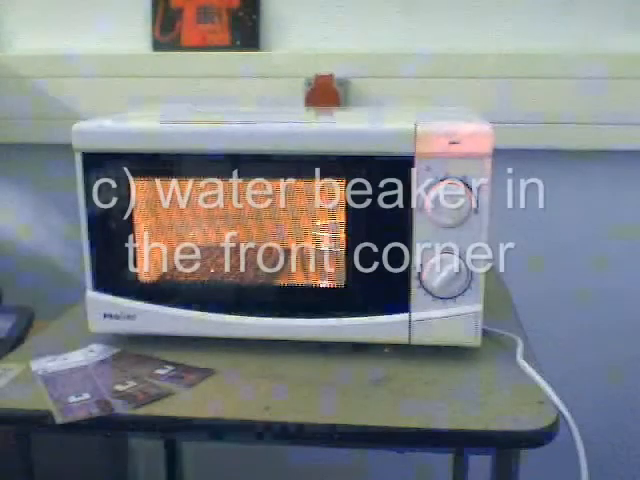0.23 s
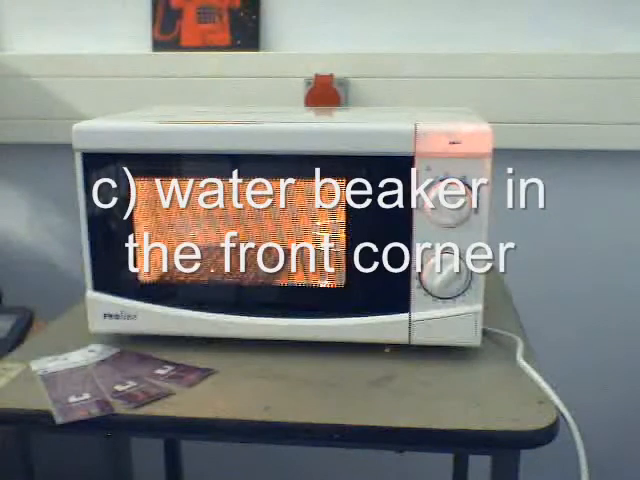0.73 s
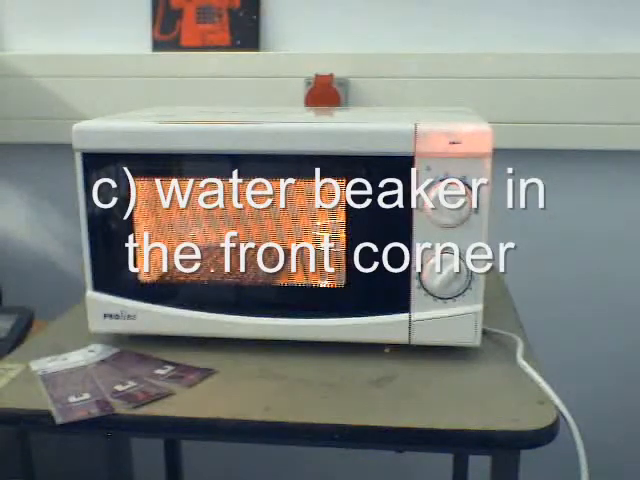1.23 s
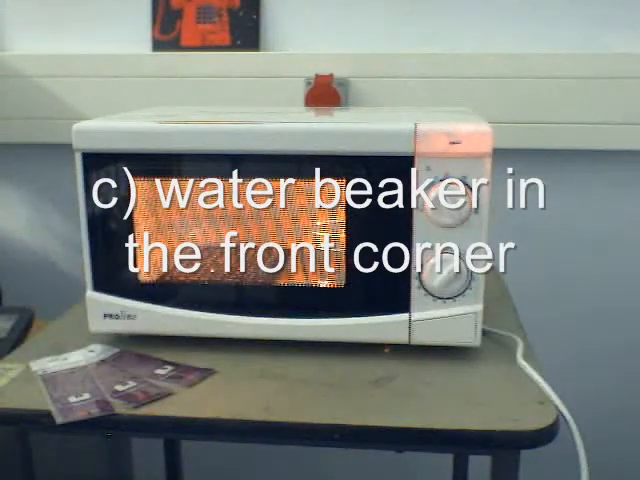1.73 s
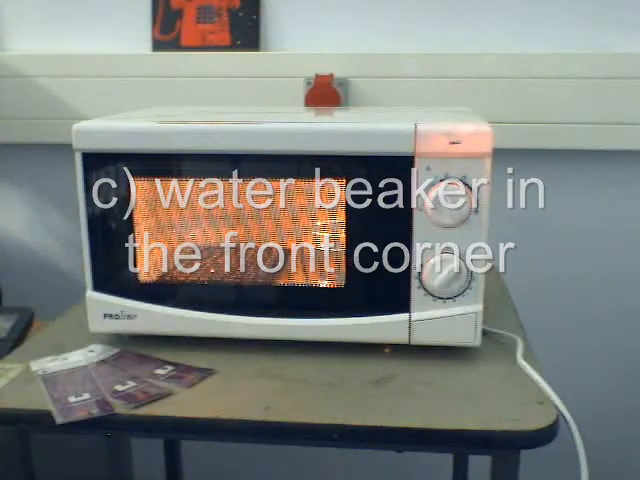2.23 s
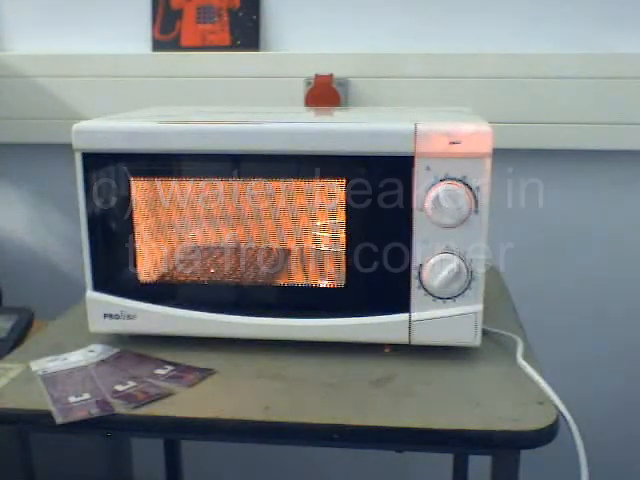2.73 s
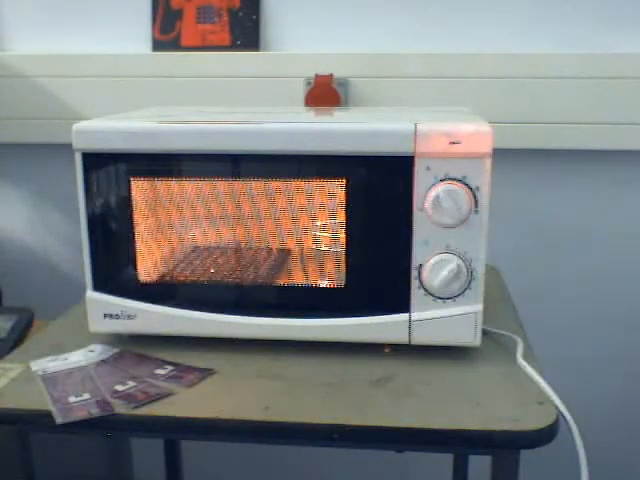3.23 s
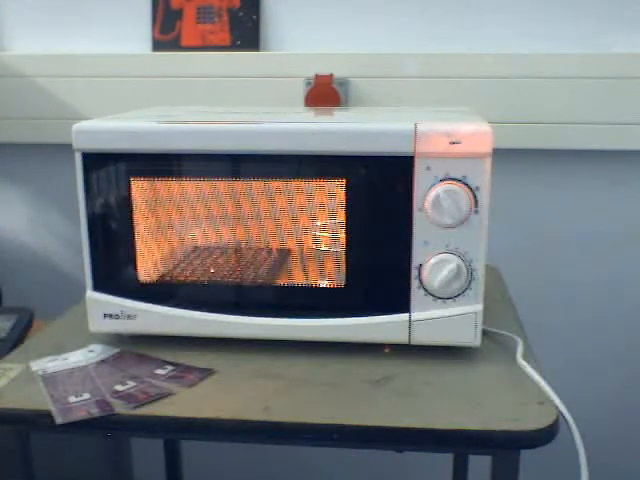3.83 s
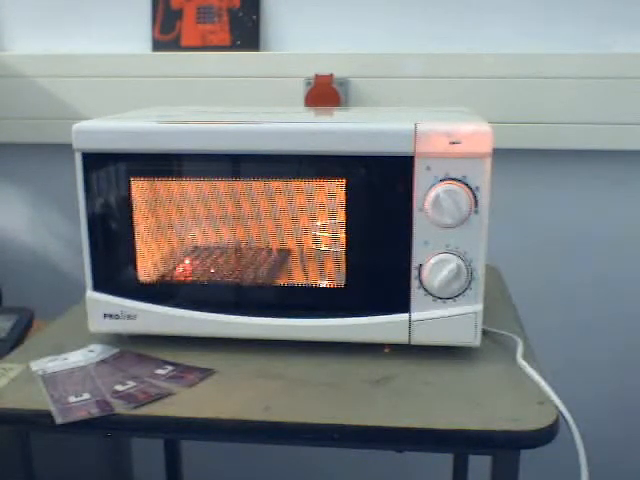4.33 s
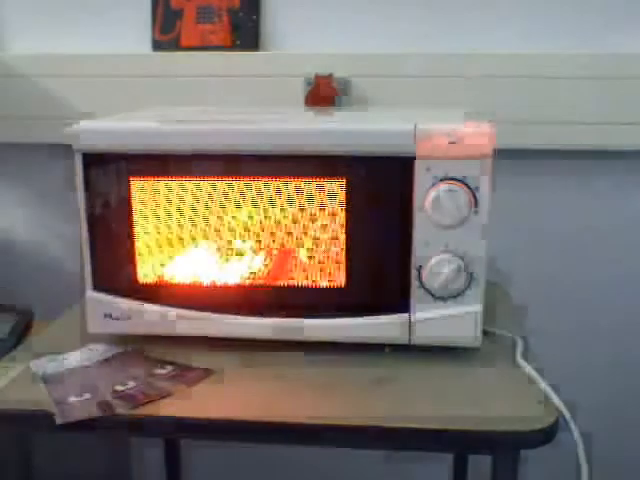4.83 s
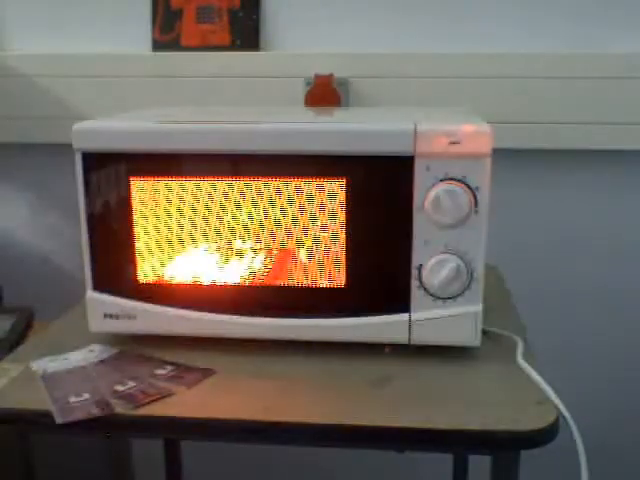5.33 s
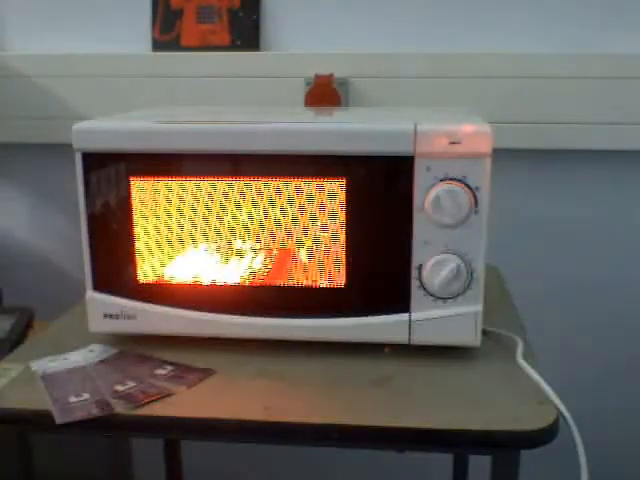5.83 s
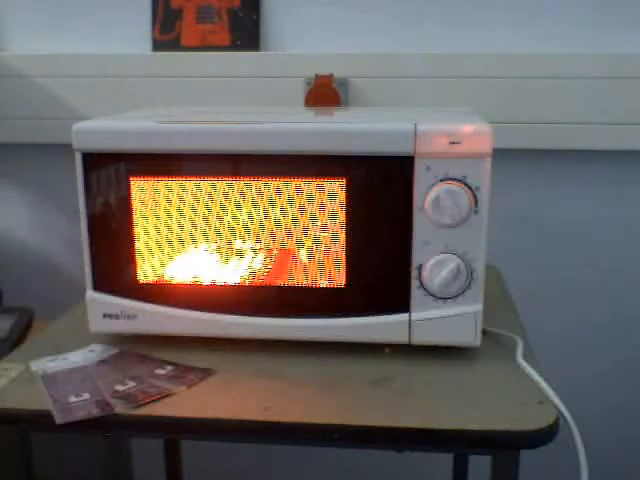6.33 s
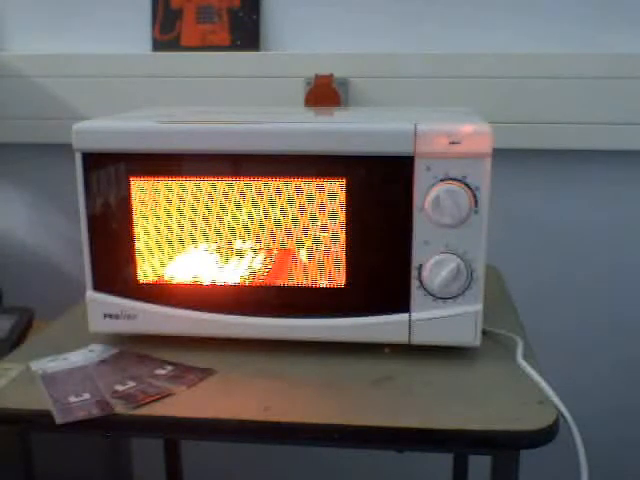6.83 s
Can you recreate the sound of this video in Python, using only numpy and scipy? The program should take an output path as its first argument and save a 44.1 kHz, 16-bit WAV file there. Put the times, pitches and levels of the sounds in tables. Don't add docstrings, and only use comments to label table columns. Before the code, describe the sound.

Steady hollow fan whir and airy rush from a microwave oven, one crisp metallic click at two seconds, then added electrical hum that shifts under load.

```python
import sys
import numpy as np
from scipy import signal
from scipy.fft import rfft, irfft
from scipy.io import wavfile
from scipy.ndimage import uniform_filter1d

SR = 44100
rng = np.random.default_rng(int(sys.argv[2]) if len(sys.argv) > 2 else 0)


def transcribe(signal):
    frames = np.atleast_2d(signal).T
    limited = np.clip(frames, -1, 1)
    pcm = np.round(limited * 32767).astype(np.int16)
    wavfile.write(sys.argv[1], SR, pcm)


def invert_db(x):
    u = np.asarray(x, float) / 20
    return 10 ** u


N = 312669

ON_S, ON_RISE_S = 1.975, .012
LOAD_S, LOAD_RISE_S = 4.55, .15


def stage(start, rise):
    since = np.maximum(np.arange(N) / SR - start, 0)
    return 1 - np.exp(-since / rise)


def coloured(points):
    hz, db = np.transpose(points)
    f = np.maximum(np.arange(N // 2 + 1) * SR / N, 1)
    shape = invert_db(np.interp(np.log(f), np.log(hz), db, left=-160, right=-160))
    return irfft(rfft(rng.standard_normal(N)) * shape, N) * np.sqrt(SR / 2)


def walk(rate):
    hold = int(SR / rate)
    steps = np.repeat(rng.standard_normal(N // hold + 1), hold)
    slewed = uniform_filter1d(uniform_filter1d(steps, hold), hold)
    return 1.45 * slewed[:N]


def ring(x, hz, width):
    return signal.lfilter(*signal.iirpeak(hz, hz / width, SR), x)


def tone(turns, db):
    return np.sqrt(2) * invert_db(db) * np.sin(2 * np.pi * (turns + rng.random()))


# (multiple of blade-pass, level re blade tone [dB])
FAN_ORDERS = [(1.5, -20), (1.75, -20), (3, -10), (4, -13.5), (4.5, -14), (5, -21), (5.12, -14), (6, -19.5)]
FAN_HZ, FAN_SAG_ON, FAN_SAG_LOAD = 161.42, .005, .005
FAN_DB, SECOND_DB = -44.2, .6
FAN_DROP_DB, SECOND_DROP_ON_DB, SECOND_DROP_LOAD_DB, FAN_SETTLE_S = -1, -2.5, -2.5, .07


def fan():
    on, load = stage(ON_S, FAN_SETTLE_S), stage(LOAD_S, LOAD_RISE_S)
    hz = FAN_HZ * (1 - FAN_SAG_ON * on - FAN_SAG_LOAD * load)
    db = FAN_DB + FAN_DROP_DB * on
    second_db = SECOND_DB + SECOND_DROP_ON_DB * on + SECOND_DROP_LOAD_DB * load
    turns = np.cumsum(hz) / SR + 0.013 * walk(2.96)
    first = tone(turns, db + 0.79 * walk(2.94))
    second = tone(2 * turns, db + second_db + 0.64 * walk(6))
    others = sum(tone(k * turns, db + under_db + 0.8 * walk(2.0)) for k, under_db in FAN_ORDERS)
    return first + second + others


def reflected(x, t60, share):
    t = np.arange(SR // 4) / SR
    echoes = rng.standard_normal(len(t)) * 1000 ** (-t / t60) * (t > .012)
    echoes *= np.sqrt(share / np.sum(echoes ** 2))
    echoes[0] = np.sqrt(1 - share)
    return irfft(rfft(x) * rfft(echoes, N), N)


# (frequency [Hz], level per Hz [dB])
AIR = [(18, -95), (27, -74), (90, -78), (230, -81), (420, -80), (700, -75), (960, -80), (1060, -88),
       (1300, -92), (1500, -95.5), (1750, -96.5), (2200, -95.5)]
# (frequency [Hz], level per Hz [dB])
VENTS = [(2200, -95.5), (2600, -95.8), (2850, -89), (3100, -89.5), (3320, -97.1), (3700, -98.5),
         (4050, -95.7), (4500, -96), (4750, -88.6), (4880, -86.5), (5050, -96.9), (5300, -102.9),
         (5900, -98.5), (7000, -99.9)]
# (frequency [Hz], width [Hz], rms level [dB])
CASE = [(65.5, 11.5, -59), (135.1, 15.2, -47.5), (173.7, 23, -51), (208, 27, -56), (247, 20, -63.5),
        (281.6, 10.6, -57.5), (337.4, 23.5, -46), (449.8, 10.6, -54), (502.5, 41.5, -48),
        (563.5, 53, -48.5), (656, 18.5, -55), (724.5, 19, -53.5), (842.4, 29, -63), (895, 25, -62),
        (930, 29, -64), (1028, 14, -66.5), (1186, 135, -70.5), (1930, 250, -70)]


def air():
    flow = coloured(AIR) * invert_db(.6 * walk(12))
    slots = coloured(VENTS) * invert_db(.3 + .4 * walk(20))
    out = reflected(flow + slots, .3, .12)
    for hz, width, db in CASE:
        once = ring(rng.standard_normal(N), hz, 2.05 * width)
        band = ring(once, hz, 2.05 * width)
        out += band / band.std() * invert_db(db + 0.74 * walk(1.59))
    return out


MAINS_HZ = 49.97
# (mains harmonic [multiple], rms level [dB])
HUM = [(2, -49.5), (4, -54.5), (5, -56.5), (6, -60), (12, -68.5), (14, -56)]
# (mains harmonic [multiple], rms level [dB], change under load [dB])
BUZZ = [(8, -51, -2), (10, -42, -6), (16, -59.5, -3), (20, -69, -6), (22, -74, -6)]
HUM_IDLE_DB, HUM_LOAD_DB = -7.5, -0.5
BUZZ_IDLE_DB, BUZZ_SAG_DB_PER_S = -20, -1
INRUSH_DB, INRUSH_S = 12, .035


def transformer():
    t = np.arange(N) / SR
    off, load = 1 - stage(ON_S, ON_RISE_S), stage(LOAD_S, LOAD_RISE_S)
    hum_db = HUM_IDLE_DB * off + HUM_LOAD_DB * load
    surge_db = INRUSH_DB * (1 - off) * (1 - stage(ON_S, INRUSH_S))
    buzz_db = BUZZ_IDLE_DB * off + surge_db + BUZZ_SAG_DB_PER_S * np.maximum(t - LOAD_S, 0)
    turns = MAINS_HZ * t
    hum = sum(tone(k * turns, db + hum_db + 0.25 * walk(0.8)) for k, db in HUM)
    buzz = sum(tone(k * turns, db + buzz_db + load_db * load + 1.33 * walk(4.39))
               for k, db, load_db in BUZZ)
    return hum + buzz


# (frequency [Hz], level per Hz [dB])
HISS = [(7000, -99.9), (7500, -107.9), (8200, -110.7), (9200, -112.7), (10200, -114), (10950, -112),
        (11700, -113.4), (12300, -115.5), (12600, -126.5), (15600, -127.5)]
CLOCK_HZ = SR / 32
# (multiple of CLOCK_HZ, rms level [dB])
CLOCK = [(1, -78), (4, -85), (5, -85), (6, -87), (7, -83), (8, -80), (9, -97), (10, -96), (11, -97)]
WHINE_S = .36
# (frequency [Hz], rms level [dB])
WHINE = [
    (7290, -77),
    (9721, -74),
]
OFFSET = .0011


def camera():
    t = np.arange(N) / SR
    clock = sum(tone(k * CLOCK_HZ * t + .015 * walk(30), db + 0.42 * walk(18)) for k, db in CLOCK)
    before, after = (tone(hz * t, db) for hz, db in WHINE)
    whine = np.where(t < WHINE_S, before, after)
    return coloured(HISS) + clock + whine + OFFSET


# (frequency [Hz], t60 [s])
ROOM = [(1000, .42), (2500, .42), (6000, .38), (11000, .2)]
ROOM_DB = -6


def room(x):
    t = np.arange(SR // 2) / SR
    tail = sum(ring(rng.standard_normal(len(t)), hz, 1.0 * hz) * 1000 ** (-t / t60) / hz ** 0.27
               for hz, t60 in ROOM)
    tail = tail * (1 - np.exp(-t / 0.0025))
    tail = tail / np.sqrt(np.sum(tail ** 2))
    return x + invert_db(ROOM_DB) * signal.fftconvolve(x, tail)[:N]


# (time [s], ring level [dB], rattle level [dB])
RELAY = [
    (1.9644, -29, -33.5),
    (1.968, -30, -34.5),
    (1.9764, -39, -40),
    (1.9844, -46, -46),
    (2.0494, -41.5, -70),
]
# (frequency [Hz], level [dB], t60 [s])
RELAY_MODES = [(1147, -14, .02), (1700, -17, .025), (2320, -13, .025), (3030, -14, .025), (4330, -14, .025),
               (4830, -14, .025), (6180, -6, .02), (6380, -2, .022), (6680, 0, .022)]
# (frequency [Hz], level per Hz [dB])
RATTLE = [(500, -39), (1100, 3), (1450, -9), (2300, -6), (3700, -11.5), (4800, -7), (5500, -18), (6500, -8),
          (7500, -14), (10000, -27.5), (14500, -36), (14900, -70)]
RATTLE_S, RING_RISE_S = .005, .00035
RING_IN_ROOM = .6
TOP = signal.ellip(8, .3, 60, 14800, fs=SR, output="sos")


def relay():
    t = np.arange(4410) / SR
    modes = sum(invert_db(db) * np.sin(2 * np.pi * hz * t) * 1000 ** (-t / t60) for hz, db, t60 in RELAY_MODES)
    modes = modes * (1 - np.exp(-(t / RING_RISE_S) ** 2))
    rattle, shakes, rings = coloured(RATTLE), np.zeros(N), np.zeros(N)
    envelope = (1 - np.exp(-t / .0004)) * np.exp(-t / RATTLE_S)
    for s, ring_db, rattle_db in RELAY:
        at = slice(int(s * SR), int(s * SR) + len(t))
        impacts = rng.standard_normal(len(t)) * np.exp(-t / 0.0022)
        ringing = signal.fftconvolve(impacts, modes)[:len(t)]
        rings[at] += invert_db(ring_db) * ringing / np.abs(ringing).max()
        shakes[at] += invert_db(rattle_db) * rattle[at] / rattle.std() * envelope
    in_room = room(shakes + RING_IN_ROOM * rings)
    return signal.sosfilt(TOP, in_room + (1 - RING_IN_ROOM) * rings)


def scene():
    return (fan() + air() + transformer() + relay())[None]


def roll_off(x):
    return signal.sosfilt(signal.butter(12, 15640, fs=SR, output="sos"), x)


def record(dry):
    mix = dry + camera()
    return roll_off(mix)


dry = scene()
out = record(dry)
transcribe(out)
```